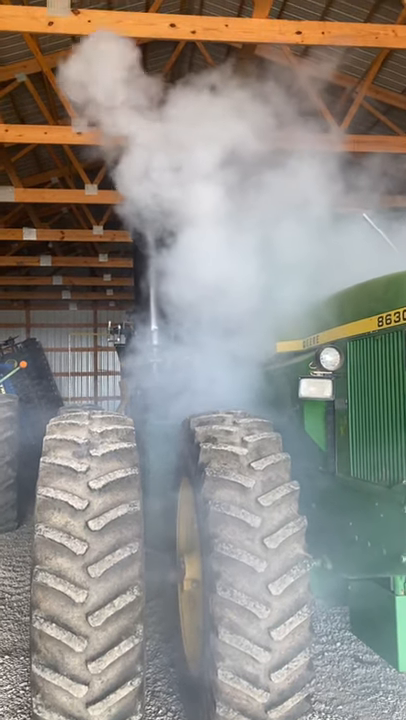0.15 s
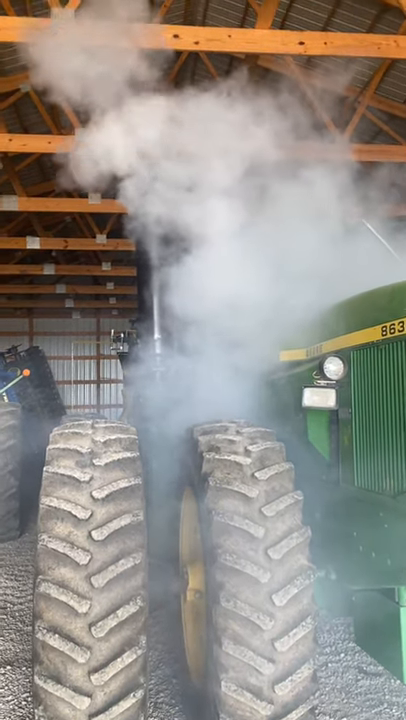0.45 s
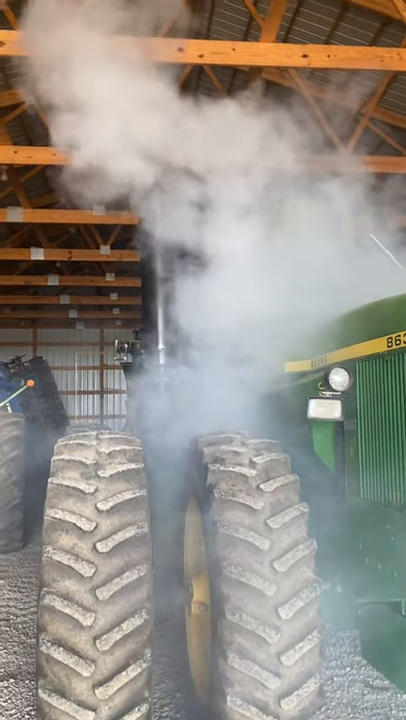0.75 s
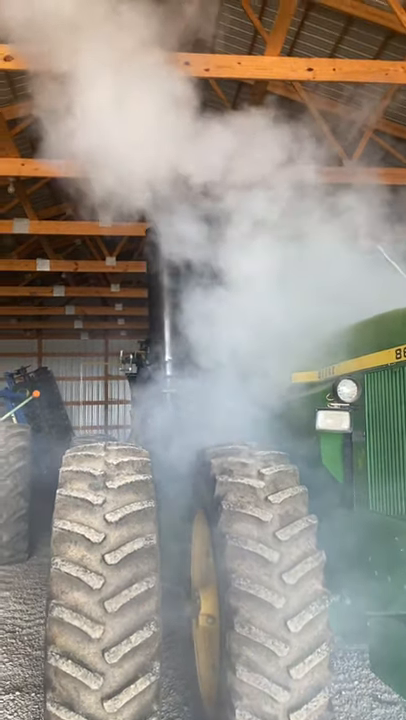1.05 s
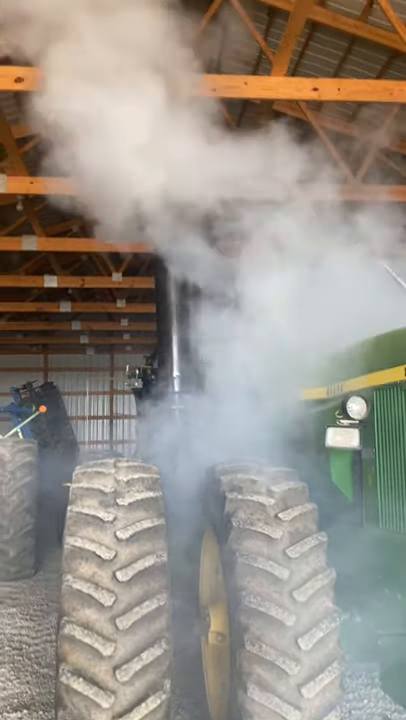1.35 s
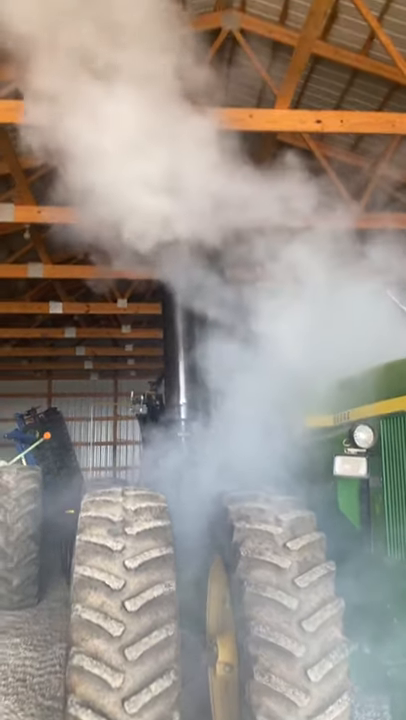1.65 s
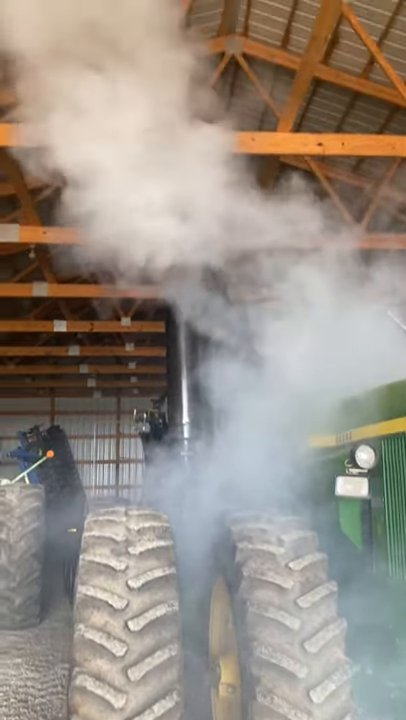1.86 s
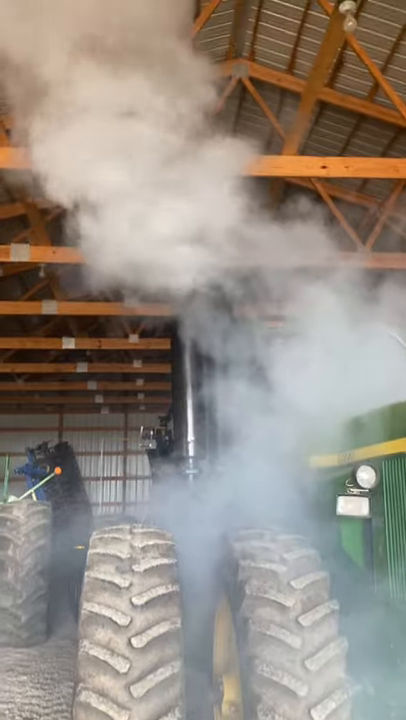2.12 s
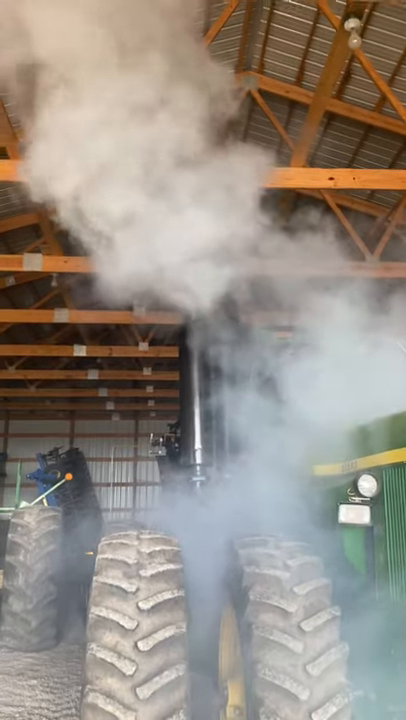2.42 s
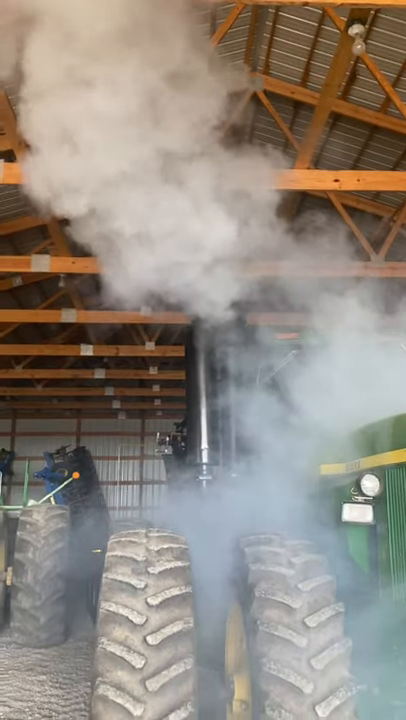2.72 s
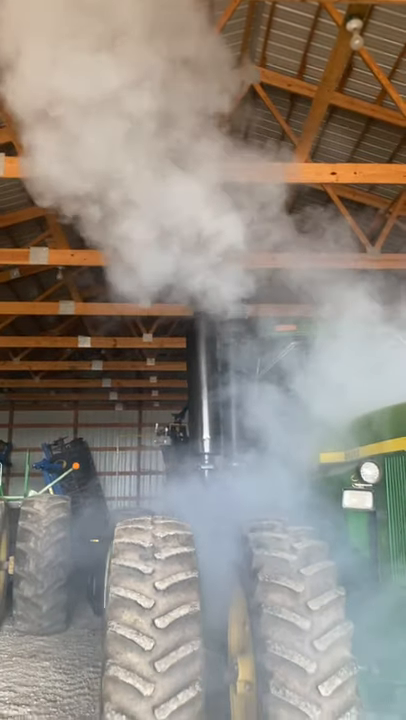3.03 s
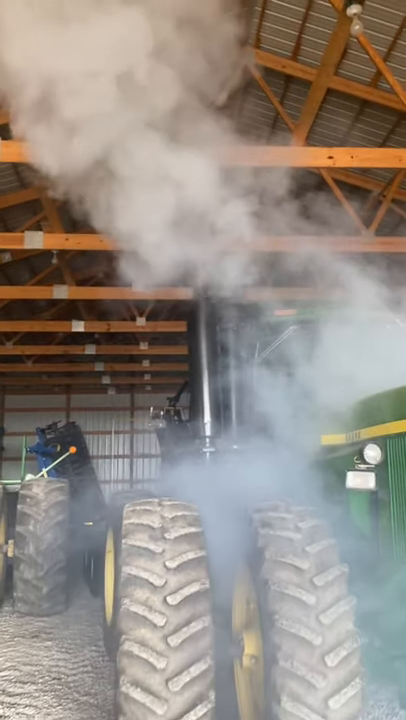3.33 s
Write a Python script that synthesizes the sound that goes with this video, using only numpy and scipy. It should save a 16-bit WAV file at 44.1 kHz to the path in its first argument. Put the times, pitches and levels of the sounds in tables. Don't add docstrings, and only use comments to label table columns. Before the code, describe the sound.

Rough diesel tractor engine stumbling at low speed, heavy knocks and exhaust puffs, quickening toward the end.

```python
import sys
import numpy as np
from scipy import signal
from scipy.fft import rfft, irfft, next_fast_len
from scipy.io import wavfile
from scipy.ndimage import uniform_filter1d, map_coordinates

SR = 44100
rng = np.random.default_rng(int(sys.argv[2]) if len(sys.argv) > 2 else 0)


def unload_wav(signal):
    wavfile.write(
        sys.argv[1],
        SR,
        np.round(np.clip(np.atleast_2d(signal).T, -1, 1) * 32767).astype(np.int16),
    )


def gain_from_db(level_db):
    decades = np.asarray(level_db, float) / 20
    return 10 ** decades


N = 153468
T = np.arange(N) / SR


def unit(x):
    return x / np.sqrt(np.mean(x ** 2) + 1e-20)


def along(points, hz):
    f, v = np.transpose(points)
    return np.interp(np.log(hz + 1), np.log(f + 1), v)


def wobble(rate):
    knots = rng.standard_normal(int(N * rate / SR) + 4)
    return map_coordinates(knots, [T * rate])


def filtered(x, response):
    m = next_fast_len(N + SR // 2)
    spectrum = rfft(x, m) * response(np.fft.rfftfreq(m, 1 / SR))
    return irfft(spectrum, m)[..., :N]


def resonances(peaks):
    def response(f):
        total = 0
        for k, (centre, width, db) in enumerate(peaks):
            mode = 1j * f * width / (centre * centre - f * f + 1j * f * width)
            total = total + (-1) ** k * gain_from_db(db) * mode
        return total
    return response


def noise(response):
    return unit(filtered(rng.standard_normal((2, N)), response))


def bursts(times, db, rise_s, t60_s, bend=1):
    age = np.clip(T - np.asarray(times)[:, None], 0, None)
    decay = gain_from_db(np.asarray(db)[:, None] - 60 * (age / t60_s) ** bend)
    rise = (1 - np.exp(-age / rise_s)) ** 2
    return np.sqrt(np.sum((decay * rise) ** 2, axis=0))


def kicks(times, db):
    push = np.zeros(N)
    push[np.clip(np.round(times * SR).astype(int), 0, N - 1)] = gain_from_db(db)
    return push


# t/s, peak level/dB, upper ring re lower/dB, cover ring re lower/dB
KNOCKS = [(0.001, -13.5, -3, -12), (0.117, -27, 4, -19), (0.171, -6, -6.5, -20), (0.3, -4.5, -19.5, -30),
          (0.433, -7, -10, -21), (0.56, -4, -15, -26), (0.684, -15.5, -1, -14), (0.8, -7, -11, -22),
          (0.92, -6, -11.5, -24), (1.038, -3.5, -12.5, -25), (1.164, -20.5, 4, -25),
          (1.273, -2.5, -13.5, -27), (1.395, -4.5, -11.5, -25), (1.505, -3, -12, -20),
          (1.633, -14, -3.5, -28), (1.74, -4, -14, -24), (1.852, -6.5, -16.5, -31), (1.964, -4, -14, -13.5),
          (2.084, -14, -6, -22), (2.191, -9.5, -16.5, -19), (2.3, -5.5, -20, -20),
          (2.412, -3.5, -16.5, -19.5), (2.52, -15, -13, -23), (2.625, -8.5, -14.5, -17.5),
          (2.724, -9, -18, -21), (2.75, -7, -22, -28), (2.807, -6, -18.5, -22), (2.898, -14, -19, -12.5),
          (3.001, -14.5, -28, -14)]
# f/Hz, width/Hz, level/dB
MANIFOLD = [(138, 23, -19), (221, 70, 4), (267, 59, -7), (409.5, 30, 1.5), (300, 140, -2.5)]
BLOCK_LOW = [(606, 116, -0.5), (791, 103, 5), (977, 176, 3.5), (1193, 312, 0.5), (1445, 610, -3.5),
             (1740, 185, -2.5)]
BLOCK_HIGH = [(1870, 113, 2.5), (2080, 140, -2.5), (2495, 142, 1.5), (3120, 270, -3.5), (3550, 480, -15)]
COVER = [(4140, 190, 3.5), (4860, 1700, -4.5)]


def knocks():
    s, db, upper_db, cover_db = np.transpose(KNOCKS)
    lead_s, crack_lag_s, crack_db = 0.0068, 0.007, 14 - 20
    slow = dict(rise_s=0.013, t60_s=0.074, bend=1.5)
    quick = dict(rise_s=0.013, t60_s=0.076)
    parts = [(MANIFOLD, db - 4, slow), (BLOCK_LOW, db, slow),
             (BLOCK_HIGH, db + upper_db + 11.5, quick), (COVER, db + cover_db + 10.5, quick)]
    shakes = rng.standard_normal((4, 2, N)) * gain_from_db(1.2 * wobble(300))
    grid_hz = np.arange(1, SR // 2)
    out = 0
    for shake, (peaks, level_db, shape) in zip(shakes, parts):
        ring = lambda f: resonances(peaks)(f) / (1 + 1j * f / 4660) ** 3
        rough = shake * bursts(s - lead_s, level_db, **shape)
        crack = kicks(s + crack_lag_s, level_db + crack_db) * [[1], [.3]]
        ring_rms = np.sqrt(np.mean(np.abs(ring(grid_hz)) ** 2))
        out = out + filtered(rough + crack, ring) / ring_rms
    return gain_from_db(1.5) * out


# t/s, peak level/dB
BLOWS = [(0.175, -7), (0.313, -2), (0.313, 1), (0.437, -25), (0.448, -14), (0.557, -6), (0.563, -3.5),
         (0.803, -2.5), (0.919, -11), (0.929, -1), (1.017, -9), (1.045, 2.5), (1.165, -5.5), (1.28, -4),
         (1.28, 3.5), (1.392, -4), (1.408, -4), (1.487, -5.5), (1.506, 3), (1.513, -10), (1.744, -13),
         (1.852, -3), (1.967, -1), (2.193, -5), (2.201, -1), (2.3, -3), (2.415, 2.5), (2.637, -7),
         (2.725, -6.5), (2.752, -6), (2.811, -7.5), (3.003, -6.5)]


def blows():
    s, db = np.transpose(BLOWS)
    rise_s, t60_s = 0.0032, 0.039
    ring = noise(resonances(BLOCK_LOW))
    power = uniform_filter1d(ring ** 2, size=SR // 250, axis=1)
    dense = ring / np.sqrt(np.abs(power) + .05)
    return gain_from_db(-2.5) * bursts(s - rise_s, db, rise_s, t60_s) * dense


# t/s, hiss peak level/dB, stack thump level/dB
PUFFS = [(0.081, -24.5, -23.5), (0.2394, -28.5, -23), (0.357, -34, -27), (0.4848, -30.5, -25),
         (0.612, -31.5, -15), (0.7287, -27, -20), (0.8525, -28.5, -19), (0.969, -27, -31), (1.09, -31, -15),
         (1.208, -24.5, -22), (1.326, -26, -26), (1.443, -26, -26), (1.558, -32, -32), (1.675, -25, -27),
         (1.788, -29, -23), (1.9026, -27.5, -27), (2.0166, -30, -22.5), (2.1274, -24.5, -21),
         (2.243, -28, -23), (2.3473, -27, -24), (2.4603, -28, -23), (2.5703, -21.5, -23),
         (2.668, -24.5, -23), (2.7617, -23, -17.5), (2.8543, -25, -13), (2.9347, -29.5, -33),
         (3.037, -29, -21), (3.191, -30.5, -31), (3.2994, -55, -42), (3.4163, -44, -26.5)]
# t/s, hiss peak level/dB
MORE_PUFFS = [
    (0.0014, -30),
    (1.9624, -34),
    (2.4089, -36),
    (2.6094, -23.5),
    (2.8835, -27),
]
# f/Hz, density level/dB
JET = [(1500, -47), (2500, -9), (4000, -3.5), (5500, 1), (7500, -4.5), (10500, -4.5), (13000, -7),
       (16000, -20)]


def puffs():
    s, db = np.transpose([row[:2] for row in PUFFS] + list(MORE_PUFFS))
    rise_s = .0038
    bright = lambda f: gain_from_db(along(JET, f))
    dull = lambda f: bright(f) / (1 + (f / 11000) ** 4)
    front = bursts(s, db, rise_s, t60_s=0.077) * noise(bright)
    tail = bursts(s, db - 5.5, rise_s, t60_s=0.23) * noise(dull)
    return gain_from_db(4.5 + 1.75 * wobble(120)) * (front + tail)


# f/Hz, width/Hz, level/dB
STACK = [(40.7, 5.1, 0), (60.5, 4.9, 2.5), (82.7, 3.3, -11.5), (124.4, 9.6, -13)]


def stack_thumps():
    s, _, db = np.transpose(PUFFS)
    lag_s, spread = 0.0041, 0.62

    def column(f):
        floor = (1j * f / (34.5 + 1j * f)) ** 4
        soft_push = 1 / (1 + 1j * f / 114) ** 2
        return resonances(STACK)(f) * floor * soft_push

    push = kicks(s + lag_s, spread * (db + 24))
    return -gain_from_db(4.5 - 32.5) * unit(filtered(push, column))


# delay/s, level/dB
POP_ECHOES = [
    (-.015, -5),
    (0, -2.5),
    (.043, 2),
]


def manifold_pops():
    s, db = np.transpose(KNOCKS)[:2]
    lag_s, pop_db = .022, 26.5
    pulses = sum(kicks(s + lag_s + later_s, db + pop_db + echo_db) for later_s, echo_db in POP_ECHOES)
    return -filtered(pulses, lambda f: resonances(MANIFOLD)(f) / (1 + 1j * f / 700) ** 2)


# t/s, shaft speed/(turns per s), drone level/dB
CATCH = [
    (2.5, 8.93, -35),
    (2.682, 10.2, -19),
    (2.71, 10.3, -29.5),
    (3.334, 10.9, -27.5),
    (3.48, 10.9, -25),
]
# order, level/dB
DRONE = [(4, -7), (5, -6), (6, 0), (8, -5), (12, -10), (14, -10)]


def drone():
    s, turns, db = np.transpose(CATCH)
    angle = 2 * np.pi * np.cumsum(np.interp(T, s, turns)) / SR
    tones = 0
    for order, level in DRONE:
        phase = rng.uniform(0, 2 * np.pi)
        tones = tones + gain_from_db(level + 2.3 * wobble(5.9)) * np.sin(order * angle + phase)
    onset = np.clip((T - s[0]) / 0.048, 0, 1)
    return gain_from_db(np.interp(T, s, db)) * onset * tones


# t/s, level/dB, brightness level/dB
EFFORT = [
    (0.0, -21, 4.5),
    (0.85, -21.5, 0),
    (1.39, -21, 2),
    (1.61, -23.5, 1.5),
    (2.27, -24.5, 2.5),
    (2.59, -24.5, 2.5),
    (2.96, -22.5, 2.5),
    (3.26, -26, 1),
    (3.48, -28, 3),
]
# f/Hz, density level/dB
ROAR = [(30, -1), (70, -7.5), (110, 2), (230, -2), (500, -6.5), (810, -7), (1300, -16.5), (2000, -46.5)]
RATTLE = [(900, -60), (1400, 1), (2200, 0.5), (2700, -1.5), (3500, -7), (5000, -10), (8000, -19),
          (14000, -39)]
# f/Hz, width/Hz, level/dB
HOLLOWS = [(231, 13, -3.5), (244, 12, 0.5), (409, 69, -17.5), (623, 81, -24), (835, 120, -13)]


def running():
    s, level, bright = np.transpose(EFFORT)
    level_db, bright_db = np.interp(T, s, level), np.interp(T, s, bright)
    hollow_roar = lambda f: gain_from_db(along(ROAR, f)) * (1 + np.abs(resonances(HOLLOWS)(f)))
    roar = gain_from_db(3.5 + 1.21 * wobble(40)) * noise(hollow_roar)
    taps = rng.standard_normal((2, N)) * gain_from_db(3 * rng.exponential(size=N))
    rattle = unit(filtered(taps, lambda f: gain_from_db(along(RATTLE, f))))
    rattle = gain_from_db(-10 + bright_db + 1.606 * wobble(60)) * rattle
    return gain_from_db(level_db) * (roar + rattle)


def shed(x):
    t = T[:SR // 2]
    t60_s, first_echo_s = .26, .012
    tail = rng.standard_normal((2, len(t))) * gain_from_db(-60 * t / t60_s) * (t > first_echo_s)
    wet = signal.fftconvolve(x, tail / np.linalg.norm(tail[0]), axes=1)[:, :N]
    return filtered(wet, lambda f: 1 / (1 + (f / 9100) ** 4))


# f/Hz, likeness
ALIKE = [(60, .9998), (150, .9995), (350, .99), (650, .84), (1500, .86), (3000, .6), (5500, .66),
         (7000, .95)]
# f/Hz, phase/rad
LEAD = [(5200, 1.1), (6800, 2.9), (8100, 3.5), (9600, 6.05), (11500, 6.6), (12600, 9.1), (14200, 9.7),
        (15600, 12.4)]
# f/Hz, level/dB
TILT = [(80, 0), (350, -.7), (700, 0), (1400, -.9), (2800, -1.5), (5000, 0)]


def scene():
    hits = puffs() + knocks() + blows()
    pipes = stack_thumps() + manifold_pops()
    pipe_pair = np.array([pipes, np.roll(pipes, SR // 7)])
    pair = hits + gain_from_db(-7) * shed(hits) + pipe_pair + drone() + running()

    def mid_side(f):
        turn = np.arccos(np.clip(along(ALIKE, f), 0, 1)) / 2
        return np.array([np.cos(turn), np.sin(turn)])

    def ports(f):
        opposite = np.array([[1], [-1]])
        lead = along(LEAD, f) * np.minimum(f / LEAD[0][0], 1) ** 2
        return gain_from_db(along(TILT, f) / 2 * opposite) * np.exp(.5j * lead * opposite)

    mid, side = filtered(pair, mid_side)
    return filtered(np.array([mid + side, mid - side]), ports)


def roll_off(x):
    return signal.sosfilt(signal.butter(12, 15830, fs=SR, output="sos"), x)


# f/Hz, level/dB
MIC = [(20, -16), (40, 0), (14500, 0), (15800, -8)]


def record(dry):
    ceiling, top_hz = .96, 15830
    soft = dry / (1 + np.abs(dry / ceiling) ** 6) ** (1 / 6)
    mix = filtered(soft, lambda f: gain_from_db(along(MIC, f)) * (f < top_hz))
    return roll_off(mix)


dry = scene()
out = record(dry)
unload_wav(out)
```